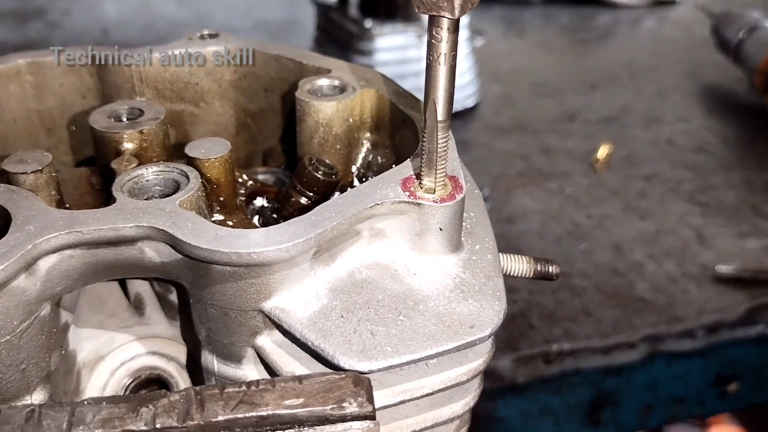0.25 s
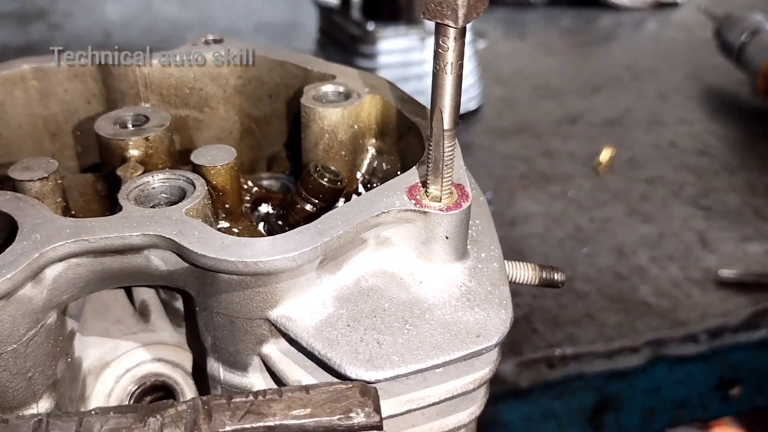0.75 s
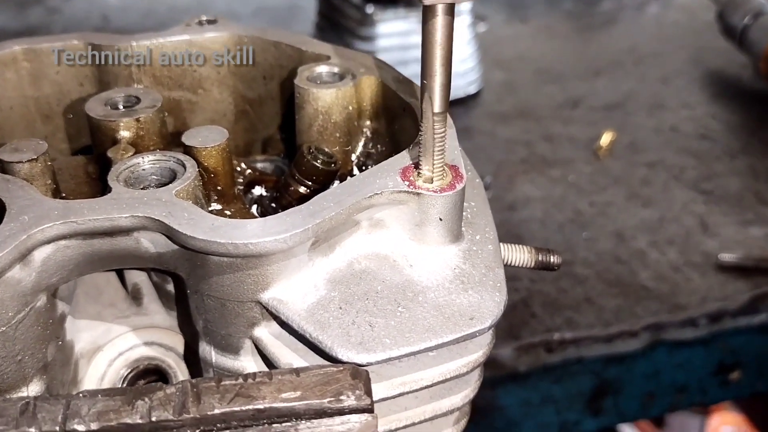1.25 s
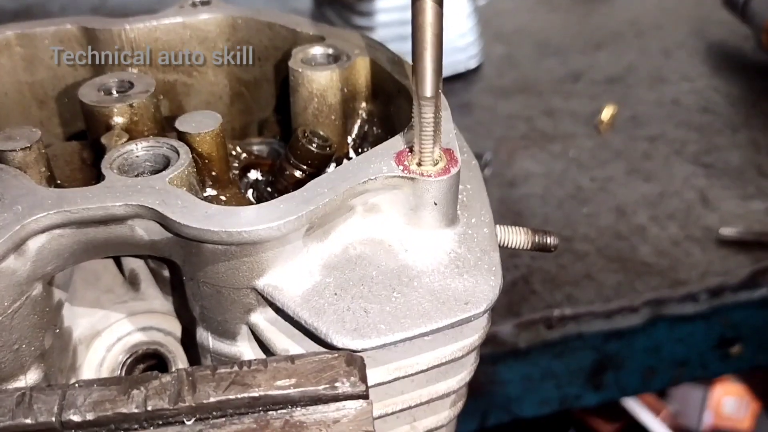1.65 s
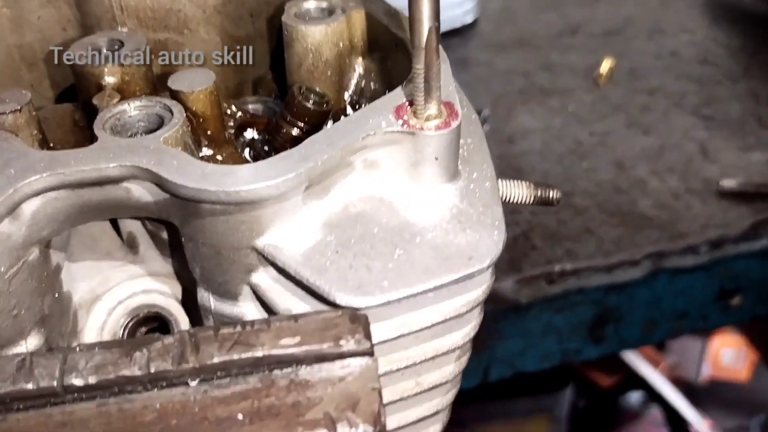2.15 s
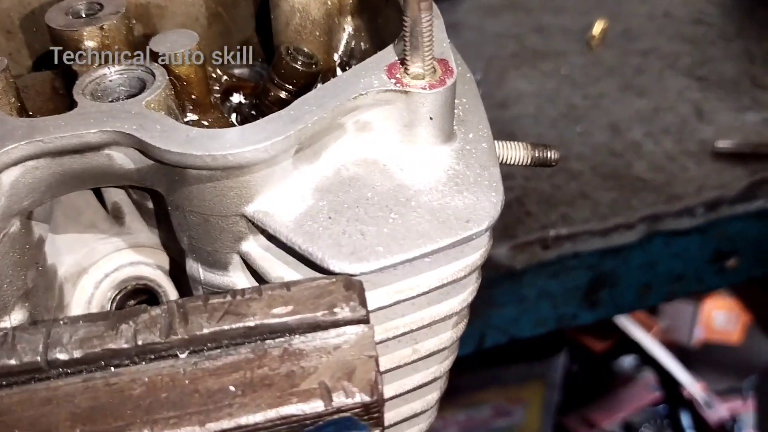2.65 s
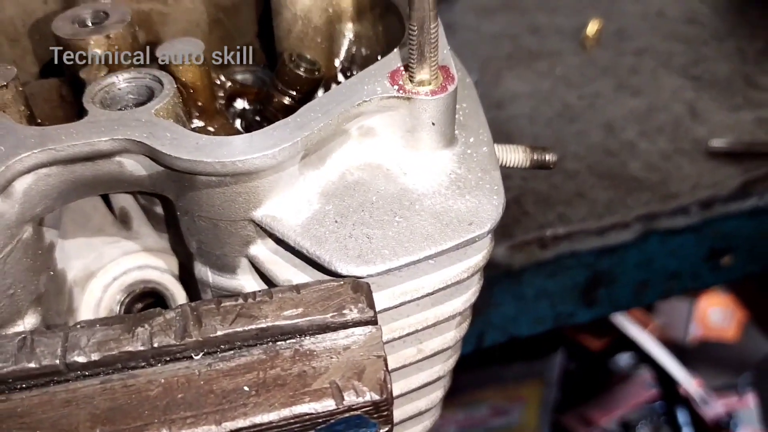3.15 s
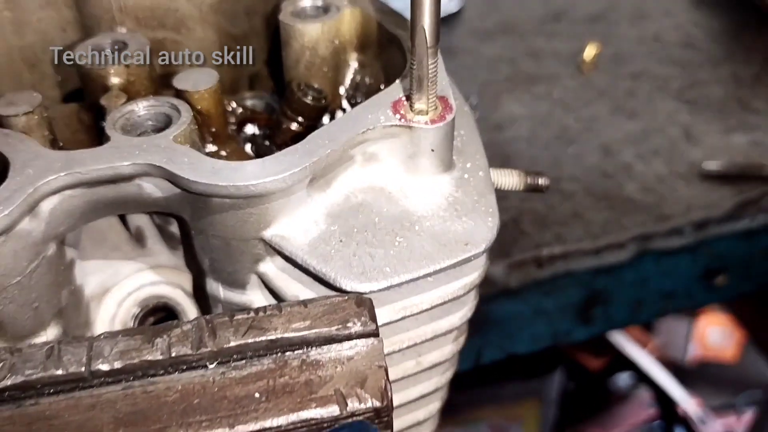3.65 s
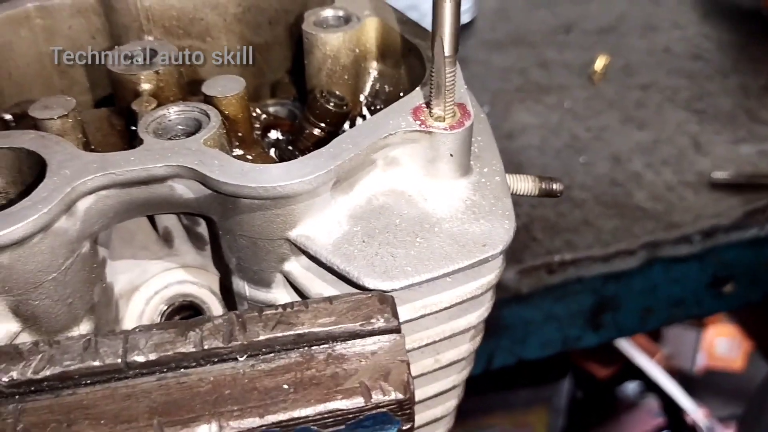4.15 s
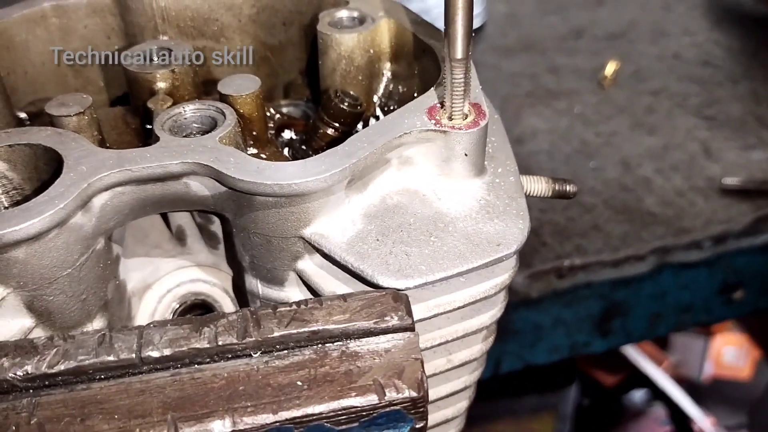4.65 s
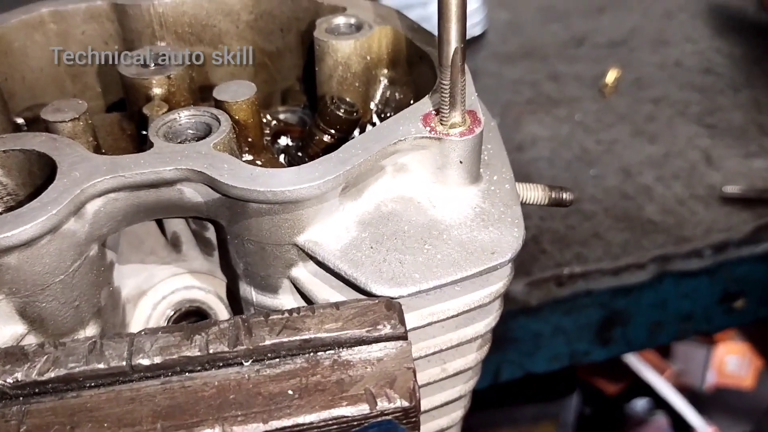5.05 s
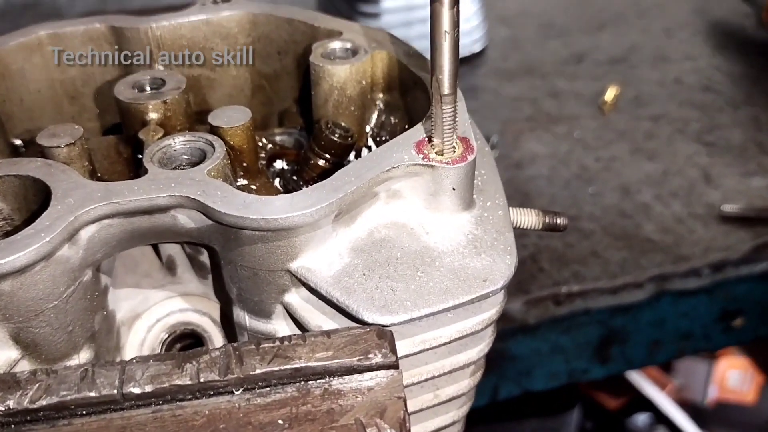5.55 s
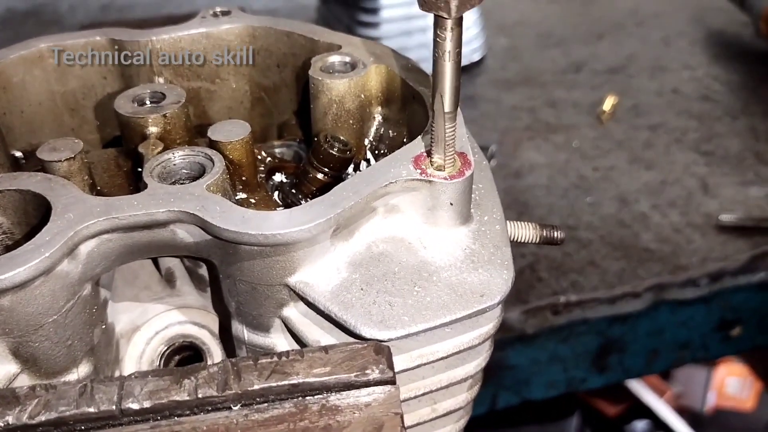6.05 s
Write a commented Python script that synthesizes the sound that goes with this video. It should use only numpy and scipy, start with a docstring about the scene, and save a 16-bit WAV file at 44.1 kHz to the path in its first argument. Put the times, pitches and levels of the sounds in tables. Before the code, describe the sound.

A hand tap is turned into an aluminium engine casting in a workshop. A cut-off squeak opens, then two short shrill strokes and three longer, grating ones follow, separated by pauses where distant machine drone swells up. Close and dry with slight room ring; low grip rubbing and dull thumps on the microphone, mostly on one side, during the first two seconds.

```python
"""In a noisy workshop a hand tap is turned stroke by stroke into an aluminium casting held in a vice.
The teeth stick and slip: dense random slips excite the modes of tap and casting, one mode locks into a squeal.
One microphone port is open; the covered one hears mostly the grip rubbing on the housing and bumping it.
Far machines are shaped noise and blurred tones; gain control led by the open port compresses both ports."""
import sys
import numpy as np
from scipy import signal
from scipy.io import wavfile
from scipy.ndimage import uniform_filter1d

SR = 44100
rng = np.random.default_rng(int(sys.argv[2]) if len(sys.argv) > 2 else 0)


def to_wav(sig):
    """Store sig (one row per channel, or 1-D mono) as 16-bit WAV at the path in sys.argv[1].

    Samples outside -1..1 are clipped; the rate is SR.
    """
    pcm = np.clip(np.atleast_2d(sig), -1, 1) * 32767
    pcm = np.round(pcm).astype(np.int16)
    wavfile.write(sys.argv[1], SR, pcm.T)  # frames by channels


N = 277830

# families of modes the contact favours, by number: 1 casting, 3 shank, 4 fins
CENTRE_LIFT_DB = {1: 6, 3: 5, 4: 8}
CENTRE_SPREAD = {1: .06, 3: .008, 4: .035}   # in natural log of frequency


def from_db(db):
    """Level to amplitude: 20 dB is a factor of ten."""
    return 10 ** (np.asarray(db) / 20)


def rms_one(x):
    """Normalisation to unit mean power."""
    return x / np.sqrt(np.mean(x ** 2) + 1e-20)


def in_time(rows):
    """Linear interpolation: the columns of a curve table, sample by sample."""
    s, *columns = np.transpose(rows)
    return np.array([np.interp(np.arange(N) / SR, s, c) for c in columns])


def low_pass(x, corner_hz):
    """First-order low-pass: the treble falls by 6 dB an octave."""
    return signal.sosfilt(signal.butter(1, corner_hz, fs=SR, output="sos"), x)


def band(x, low_hz, high_hz, order=2):
    """Butterworth band-pass: flat between two corner frequencies."""
    return signal.sosfilt(signal.butter(order, [low_hz, high_hz], "band", fs=SR, output="sos"), x)


def drift(corner_hz, spread_db=None):
    """Low-passed noise: slow chance with spread 1, or a gain that wavers by so many dB."""
    step = 40   # samples between the points of the slow curve
    r = np.exp(-2 * np.pi * corner_hz * step / SR)
    white = rng.standard_normal(N // step + 2002)
    slow = rms_one(signal.lfilter([1], [1, -2 * r, r * r], white)[2000:])
    curve = slow if spread_db is None else from_db(spread_db * slow)
    return np.interp(np.arange(N) / step, np.arange(len(slow)), curve)


def resonance(x, hz, width_hz):
    """Damped oscillator as a two-pole filter: gain 1 on top, and the narrower the longer it rings."""
    r = np.exp(-np.pi * width_hz / SR)
    zeros = np.array([1, 0, -1]) * (1 - r * r) / 2
    return signal.lfilter(zeros, [1, -2 * r * np.cos(2 * np.pi * hz / SR), r * r], x)


def shop_noise(swell_db):
    """Spectral shaping: quarter-octave bands of noise, each patchy in its own time."""
    # spectrum of the far machines and traffic, relative: f/Hz, density/dB per Hz
    spectrum = [(35, -59), (60, -26), (93, 2), (157, 0.5), (237, -2.5), (446, -1.5), (555, -1.5),
                (1190, -9.5), (1720, -4.5), (2500, -15.5), (3110, -21), (3780, -10.5), (4310, -28),
                (6960, -36), (11000, -64.5), (14300, -99), (22000, -120)]
    total_db, patchy_db = -47.5, 2.5
    hz, density_db = np.transpose(spectrum)
    edges = 50 * 2 ** np.arange(0, 8, 1 / 4)
    white = rng.standard_normal((2, N))   # neighbouring bands take different noise
    out = 0
    for k, (low, high) in enumerate(zip(edges, edges[1:])):
        db = np.interp(np.log(low * high) / 2, np.log(hz), density_db)
        gain = from_db(db + swell_db(low)) * drift(4.3, spread_db=patchy_db)
        out = out + gain * band(white[k % 2], low, high, order=3)
    return from_db(total_db) * rms_one(band(out, 93, 11400, order=4))


def shop_tones(swell_db):
    """Narrow-band noise: two resonances in series blur each tone, and its level wavers."""
    # tones of the far machines: f/Hz, width/Hz, level/dB
    tones = [(172.7, 11, -69), (241.1, 11, -62.5), (545.3, 16, -62.5), (811, 45, -67.5), (1730, 59, -65),
             (2182, 42, -74), (2630, 89, -90), (3056, 380, -65), (3930, 38, -74), (4500, 45, -100),
             (5230, 42, -82.5), (5500, 55, -96), (6600, 64, -90), (6900, 360, -86.5)]
    waver_db = 4.5
    white = rng.standard_normal(N)
    out = 0
    for hz, width_hz, db in tones:
        tone = rms_one(resonance(resonance(white, hz, width_hz), hz, width_hz))
        out = out + from_db(db + swell_db(hz)) * drift(2.3, spread_db=waver_db) * tone
    return out


def shop():
    """Superposition of distant machines and traffic: noise and tones share the swell of the low drone."""
    # how the low drone swells and sinks: t/s, level/dB
    drone = [(0, -3), (.6, 4), (1.0, 3.5), (1.6, 3.5), (2.1, -5), (2.6, -3), (3.5, 0), (3.8, 4), (4.2, -1),
             (5.1, -0.5), (5.4, 2.5), (6.3, 1)]
    drone_db, drone_top_hz = in_time(drone)[0], 330

    def swell_db(hz):
        """Level modulation of the lows alone."""
        return drone_db * (hz < drone_top_hz)

    return shop_noise(swell_db) + shop_tones(swell_db)


def rubbing():
    """Friction noise: lumpy low rubbing, independent in each port, swells as the grip shifts on the housing."""
    # shifts of the grip: t/s, length/s, open port level/dB, covered port level/dB
    rubs = [(0.955, 0.055, -73, -70), (1.039, 0.48, -39, -67), (1.21, 0.19, -36.5, -54),
            (1.56, 0.2, -64, -53.5), (1.764, 0.27, -37, -52), (2.073, 0.45, -59.5, -71),
            (2.507, 0.33, -58.5, -79), (3.003, 0.28, -85, -63), (3.27, 0.19, -64, -56),
            (3.54, 0.31, -69, -59), (4.033, 0.26, -78, -57.5), (6.11, 0.19, -45, -84)]
    edge_s = .03
    hold_db = -77.5   # the hand never rests quite still
    lumps = np.array([rms_one(band(rng.standard_normal(N), 58, 150) * drift(8.7, spread_db=4.5))
                      for port in range(2)])
    t = np.arange(N) / SR
    amplitude = from_db(hold_db)
    for s, length, open_db, covered_db in rubs:
        to_edge = np.minimum(t - s, s + length - t)
        fade = np.clip(to_edge / edge_s + .5, 0, 1) ** 2
        amplitude = amplitude + from_db([[open_db], [covered_db]]) * fade
    return lumps * amplitude


def bumps():
    """Impulse response of a cavity: fingers bumping by the covered port ring the air under the cover."""
    # bumps: t/s, level/dB, ring f/Hz, decay by 60 dB/s, sharp edge against the ring/dB
    knocks = [(1.233, -23.5, 100, 0.17, -28), (1.413, -30, 109, .03, 3), (1.457, -18, 113, 0.026, -18),
              (1.979, -11, 107, 0.04, -12), (1.995, -30, 88, 0.1, -14), (2.256, -52, 99, 0.076, -25),
              (3.561, -35, 91, 0.12, -9), (6.142, -54, 100, 0.028, -15)]
    t = np.arange(SR // 5) / SR
    out = np.zeros(N)
    for s, db, hz, t60, edge_db in knocks:
        ring = -np.cos(2 * np.pi * hz * t) * from_db(-60 * t / t60) * np.minimum(t / 0.0015, 1)
        edge = -from_db(edge_db) * np.exp(-t / 0.00039)
        softened = signal.lfilter([.3], [1, -.7], ring + edge)
        at = round(s * SR)
        out[at:at + len(t)] += from_db(db) * softened[:N - at]
    return out


def room(x):
    """Diffuse reverberation: convolution with a dying noise tail, duller than the direct sound."""
    t60_s, level_db, dull_hz = 0.24, -12, 5740
    t = np.arange(SR // 2) / SR
    tail = rng.standard_normal(len(t)) * from_db(-60 * t / t60_s) * (t > .004)
    tail = low_pass(tail, dull_hz)
    return from_db(level_db) * signal.fftconvolve(x, tail / np.sqrt(np.sum(tail ** 2)))[:N]


def slip_train():
    """Stick-slip as a random pulse train: dense slips of either sign and slightly uneven size."""
    slips_per_s, spread_db = 6000, 0.5
    sizes = from_db(spread_db * np.minimum(rng.exponential(1, N), 4)) * rng.choice([-1, 1], N)
    return rms_one(sizes * (rng.random(N) < slips_per_s / SR))


def cutting_force():
    """Force partition: the cutting force of each stroke is shared among squeal and families of modes."""
    # one curve a stroke: t/s, cutting force/dB, squeal against force/dB, shank ring against force/dB,
    # centre of the casting's ring f/Hz, centre of the fins' ring f/Hz
    strokes = [
        [(0.0, -15.5, -26, -11, 2500, 6500), (0.042, -19, -12, -6, 2340, 6700),
         (0.085, -15.5, -4, -24, 2480, 6400)],
        [(1.025, -30, -10, -11, 2300, 6750), (1.07, -24.5, -6.5, -10, 2300, 6600),
         (1.115, -18.5, 5, -10, 2320, 6550), (1.16, -22.5, -11, -11, 2380, 6900),
         (1.205, -19.5, 4, -8, 2390, 6600), (1.25, -17, -6, -6, 2430, 6550.0),
         (1.295, -18.5, -6, -8, 2370, 6900), (1.34, -21.5, -9, -3, 2320, 6600),
         (1.385, -22, -7, -9, 2300, 6900), (1.43, -26, -10, -6, 2300, 6900.0)],
        [(1.72, -31.5, -6, -4, 2630, 6400), (1.744, -32, 3, -11, 2600, 6440), (1.756, -28, -9, -4, 2540, 6460),
         (1.764, -27, 2, -17, 2500, 6600), (1.769, -24.5, 8.5, -22, 2500, 6500),
         (1.78, -25, 2, -18, 2360, 6600), (1.785, -21, 3, -14, 2260, 6600),
         (1.796, -20.5, 5.5, -20, 2230, 6540), (1.81, -19, 3, -8, 2300, 6750), (1.817, -24, -4, -1, 2330, 6750),
         (1.828, -18, -1.5, -16, 2400, 6700), (1.861, -19.5, 0, -7, 2380, 6600),
         (1.908, -19, -1, -8, 2770, 6800), (1.95, -24, -1, -11, 2500, 6700), (1.958, -49, 17, -22, 2500, 6700),
         (1.98, -59, 12, -15, 2500, 6740)],
        [(2.619, -35.5, -18, -8, 2410, 6900), (2.663, -25.5, 4.5, -8, 2470, 6640),
         (2.708, -23.5, -8, -8, 2580, 6770), (2.752, -20.5, -9, -6, 2450, 6600),
         (2.797, -23, -10, -9, 2500, 6700), (2.841, -21, -14, -8, 2510, 6740.0),
         (2.886, -20.5, -3, -11, 2510, 7000), (2.93, -20.5, -13, -14, 2570, 7300),
         (2.975, -19, -5, -16, 2900, 6870), (3.019, -18.5, -10, -15.2, 2470, 7100),
         (3.064, -19.5, -10, -17, 2560, 6970), (3.108, -18, -5.5, -11, 2630, 6870.0),
         (3.153, -22, -9, -17, 2820, 7000), (3.197, -21, -15, -8, 2620, 7500), (3.242, -21, 1, -11, 2750, 7100),
         (3.286, -19, -9, -11, 2710, 7140), (3.325, -24.5, -17, -14, 2650, 7200),
         (3.341, -19.5, -24, -12, 2640, 7200), (3.356, -24, -16, -11, 2580, 7100),
         (3.371, -21.5, -19, -16, 2530, 6900), (3.38, -34, -11, -14, 2620, 6900)],
        [(4.237, -31, -15, -13, 2520, 6350), (4.282, -29, -9, -10, 2530, 6960),
         (4.326, -20.5, -8, -9, 2520, 6800), (4.371, -18.5, 0, -20, 2500.0, 6620.0),
         (4.415, -15.5, 1.5, -18, 2330, 6750), (4.46, -22, -4, -6, 2330, 6870.0),
         (4.504, -18.5, -2.5, -13, 2440, 7100), (4.549, -19.5, -10, -10, 2470, 7100),
         (4.594, -18.5, -3, -9.8, 2480, 6900), (4.638, -19.5, -15, 1, 2520, 6530.0),
         (4.683, -19, -7, 3, 2520, 7300), (4.727, -20, -1, -9, 2760, 6660),
         (4.772, -21, -5.5, -0.5, 2720, 6340), (4.816, -24.5, -17, -4, 2630, 6800),
         (4.861, -20, 0, -4, 2820, 6800), (4.905, -18.5, -8.5, -7.5, 2530, 6690.0),
         (4.95, -17.5, -0.5, -10, 2600, 6900)],
        [(5.496, -32, -4, -10, 2750, 6450), (5.54, -29.5, -3, -6, 2550, 6700),
         (5.584, -22, -6, -14, 2760, 6700), (5.628, -23, -5, -12, 2680, 6500),
         (5.672, -22.5, -20, -11, 2540, 6700), (5.716, -19.8, -1.5, -17.9, 2800, 7000),
         (5.76, -19.5, -3, -13, 2630, 6900), (5.804, -20.5, -14, -13, 2740, 6460),
         (5.847, -22, -6, -10.2, 2700, 6700), (5.891, -21, -13, -15, 2860, 6600.0),
         (5.935, -21.5, -9, -12, 2650, 6600), (5.979, -20, -7, -12, 2630, 6340),
         (6.023, -20, -8, -16, 2500.0, 6300), (6.067, -20, -19, -27, 2630.0, 6450),
         (6.111, -21, -9, -1.5, 2890, 6300), (6.155, -21.5, -16, -12, 2650, 6100)],
    ]
    # where the teeth bear in each stroke: vice/dB, casting/dB, centre of the shank's ring f/Hz,
    # fins/dB, teeth/dB
    contact = [(-25, -7, 5990, -3.5, -4), (-4.5, -8.5, 6030, 0.5, 0.8), (-8.5, -5.5, 6030, -2, 0.5),
               (0.5, -2.5, 6000, 0, 0), (-1.5, -2.5, 6060, 1.5, -0.9), (2.5, -2, 5980, -0.5, 1.3)]
    # vice, casting, fins, teeth: level against force/dB, share of the squeal's swing, of the shank's swing
    families = [(-23, 0.43, -0.025), (4, -0.15, 0.13), (-3.5, 0.16, 0.22), (-12, -0.18, -0.16)]
    # the flutes' ring against the casting's: t/s, level/dB
    flutes = [(0, -3.5), (1.07, -6.5), (1.16, -8.5), (1.25, -5), (1.36, -9), (1.42, -2.5), (1.73, -1),
              (1.77, -8), (1.85, -6), (2.66, -9), (2.75, -9.5), (2.84, -9), (2.93, -3), (3.02, -7.5),
              (3.11, -6), (3.2, -3.5), (3.32, -5), (4.28, -8.5), (4.37, -18), (4.46, -17), (4.6, -17),
              (4.73, -10), (4.82, -9.5), (4.9, -11), (5.54, -5), (5.72, -10), (5.81, -10), (5.9, -7.5),
              (6.08, -9.5)]
    # the wrench is set back: t/s, level/dB
    ticks = [(3.62, -69)]
    breakaway_db, breakaway_s, build_db, build_s = 13, 0.0015, -8, 0.01
    usual_squeal_db, usual_shank_db, usual_centre_hz = -10.5, -23, 2500
    vice_db_per_100hz = -3   # the lower the casting rings, the more the vice joins in
    shank_radiation_db = 5.5   # how well the shank radiates
    t = np.arange(N) / SR
    wavers = [0.8 * drift(2.9) for _ in families]   # dB
    flutes_db = in_time(flutes)[0]
    force = np.zeros((7, N))   # squeal, vice, casting, flutes, shank, fins, teeth
    centre_hz = {k: np.ones(N) for k in CENTRE_LIFT_DB}
    for stroke, (vice_at, casting_at, shank_hz, fins_at, teeth_at) in zip(strokes, contact):
        start, end = stroke[0][0], stroke[-1][0]
        on = (t >= start) & (t <= end)
        since = t[on] - start + (start == 0)   # the first stroke is already under way
        # the tap tears loose with a jerk, then the torque builds up
        start_db = breakaway_db * np.exp(-since / breakaway_s) + build_db * np.exp(-since / build_s)
        force_db, squeal_db, shank_db, casting_hz, fins_hz = in_time(stroke)[:, on]
        squeal_swing, shank_swing = squeal_db - usual_squeal_db, shank_db - usual_shank_db
        # what the squeal and the shank take, other families gain or lose
        vice, casting, fins, teeth = [db + a * squeal_swing + b * shank_swing + waver[on]
                                      for (db, a, b), waver in zip(families, wavers)]
        vice = vice + vice_db_per_100hz * (casting_hz - usual_centre_hz) / 100
        shares_db = np.array([squeal_db, vice + vice_at, casting + casting_at,
                              casting + casting_at + flutes_db[on], shank_db + shank_radiation_db,
                              fins + fins_at, teeth + teeth_at])
        force[:, on] = from_db(force_db + start_db + shares_db)
        centre_hz[1][on], centre_hz[3][on], centre_hz[4][on] = casting_hz, shank_hz, fins_hz
    for s, db in ticks:
        at = round(s * SR)
        force[4:, at:at + 200] += from_db(db + np.array([[0.5], [7.0], [-9.0]]))   # the fins most
    return force, centre_hz


def squeal(slips, force):
    """Mode locking: a wandering sine and the mode's loose response to the slips, through one resonance."""
    hz, wander_hz, width_hz, roughness = 4336, 22, 70, 1.2
    phase = 2 * np.pi * np.cumsum(hz + wander_hz * drift(23.15)) / SR
    locked = np.sqrt(2) * np.sin(phase)
    loose = rms_one(resonance(slips, hz, width_hz))
    return resonance(force * (locked + roughness * loose) + 1e-18, hz, width_hz)


def ringing(slips, force, centre_hz):
    """Modal superposition: slips scaled by each family's force excite its damped modes."""
    # modes of tap and casting; the narrowest ring on after each stroke:
    # f/Hz, width/Hz, level within the family/dB
    modes = [(1097, 42, -15), (1175, 50, -19), (2295, 60, -7), (2400, 105, -8.5), (2510, 45, -3.5),
             (2530, 20, -4), (2556, 12, -3), (2596, 34, -1.5), (2670, 41, -9), (2820, 90, -8),
             (3720, 1200, -30.5), (3775, 25, -17), (3990, 18, -6), (4035, 55, -4), (4100, 17, -3),
             (4126, 32, 0.5), (4320, 15, -4), (4348, 16, -5), (4588, 28, -12), (4260, 320, -20),
             (4780, 1450, -26.5), (5690, 90, -18), (5860, 60, -16), (5992, 35, -4), (6030, 20, -7),
             (6064, 35, -3), (6450, 150, -13.5), (6540, 45, -12), (6730, 55, -11), (6900, 60, -16),
             (7150, 70, -17), (7340, 90, -14), (7650, 120, -19), (8020, 60, -13), (7900, 800, -24),
             (8280, 40, -18), (9000, 500, -32), (8720, 60, -13), (8823, 33, -14), (9295, 35, -16),
             (9700, 45, -24), (10000, 40, -29), (10200, 35, -28), (10600, 60, -26), (11200, 50, -26),
             (11500, 40, -30), (11000, 1500, -42), (12860, 40, -13), (13600, 60, -20), (14000, 190, -18),
             (14300, 1200, -34), (14800, 40, -28), (15250, 120, -28)]
    # bounds between vice, casting, flutes, shank, fins and teeth: f/Hz
    family_edges = [1500, 3300, 5200, 6250, 8300]
    grip_waver_db, broad_hz = 2.2, 300
    hz, width_hz, db = np.transpose(modes)
    family = np.searchsorted(family_edges, hz)
    # each family is brought to unit level
    power = np.bincount(family, from_db(2 * db) * width_hz * np.pi / SR)
    out = np.zeros(N)
    for j, k in enumerate(family):
        bite = drift(11.0, spread_db=grip_waver_db)   # each mode is caught and let go in its own time
        if k in centre_hz:   # the contact moves round the thread and favours the modes near its centre
            near = np.exp(-(np.log(centre_hz[k] / hz[j]) / CENTRE_SPREAD[k]) ** 2)
            bite = bite * from_db(CENTRE_LIFT_DB[k] * (near - 1.5))
        # broad humps stand for many small modes, driven by other teeth: their slips are shifted in time
        own_slips = np.roll(slips, 997 * j * (width_hz[j] > broad_hz))
        gain = (-1) ** j * from_db(db[j]) / np.sqrt(power[k])
        out += gain * resonance(own_slips * force[k] * bite + 1e-18, hz[j], width_hz[j])
    return out


def tap():
    """Stick-slip excitation: the same slips feed squeal and modes, then dips hollow the spectrum."""
    # dips in the spectrum: f/Hz, width/Hz, depth (1 cancels the centre)
    hollows = [(1500, 310, 1), (1890, 27, 0.67), (2960, 520, 0.27), (3310, 310, 0.65), (5120, 170, 0.21),
               (10270, 130, 0.62), (11950, 500, 0.18), (11960, 220, 0.89), (11700, 180, 0.9),
               (11600, 180, 0.4)]
    slips = slip_train()
    force, centre_hz = cutting_force()
    out = squeal(slips, force[0]) + ringing(slips, force[1:], centre_hz)
    for hz, width_hz, depth in hollows:
        out = out - np.clip(depth, 0, 1) * resonance(out, hz, width_hz)
    return out


def scene():
    """Transmission loss: the open port hears the air, the cover passes lows of the shop and a thin leak."""
    cover_hz, cover_db, leak_db, leak_top_db = 130, -19.5, -44.5, -26
    squeak = tap()
    air = squeak + room(squeak) + shop()
    through = from_db(cover_db) * low_pass(shop(), cover_hz)   # noise of its own, unlike the open port's
    leak = from_db(leak_db) * air + from_db(leak_top_db) * band(air, 12500, 16000)
    ports = np.array([air, through + leak]) + rubbing()
    ports[1] += bumps()
    return ports


def record(dry):
    """Dynamic compression led by the open port, after faint hiss and rumble filter, before a steep top cut."""
    hiss_db, cutoff_hz = -102, 15350
    knee_db, slope, smoothing_s, fall_db_per_s, quiet_gain_db = -48.5, 0.54, 0.01, 237, 17
    hissy = dry + from_db(hiss_db) * rng.standard_normal(dry.shape)
    clean = signal.sosfilt(signal.butter(2, 80, "high", fs=SR, output="sos"), hissy)
    level_db = 10 * np.log10(uniform_filter1d(clean[0] ** 2, size=1024, mode="reflect") + 1e-12)
    # the held level follows rises at once and falls at a steady rate
    fall = fall_db_per_s * np.arange(N) / SR
    held_db = np.maximum.accumulate(level_db + fall) - fall
    cut_db = slope * np.maximum(held_db - knee_db, 0)
    r = np.exp(-1 / (smoothing_s * SR))
    cut_db = signal.lfilter([1 - r], [1, -r], cut_db, zi=[r * cut_db[400]])[0]   # starts settled
    top_cut = signal.ellip(10, .5, 70, cutoff_hz, fs=SR, output="sos")
    return signal.sosfilt(top_cut, clean * from_db(quiet_gain_db - cut_db))


dry = scene()
out = record(dry)
to_wav(out)
```